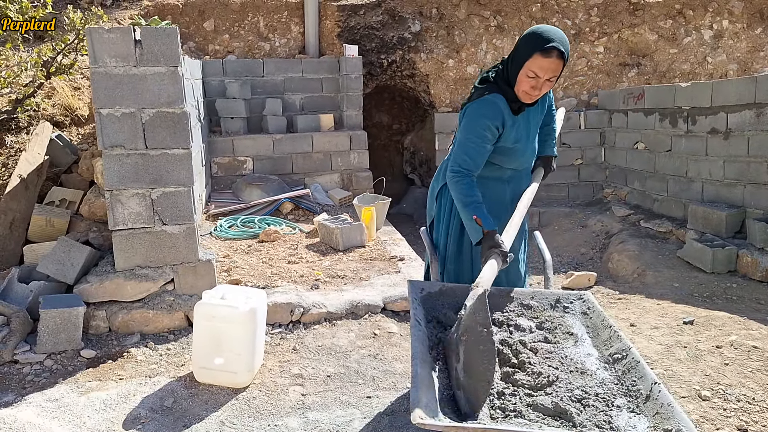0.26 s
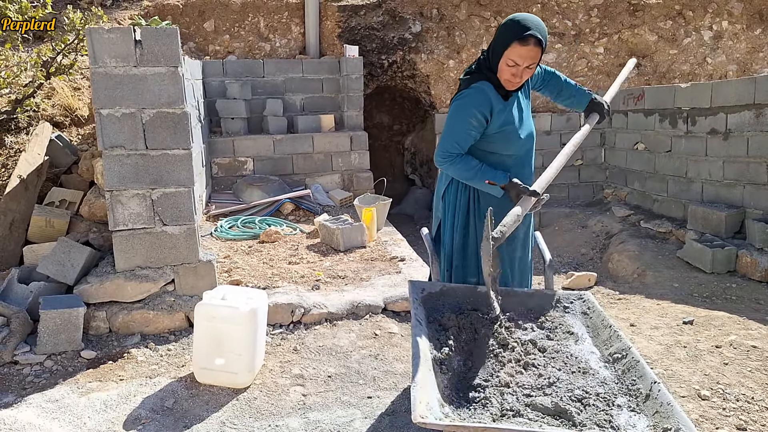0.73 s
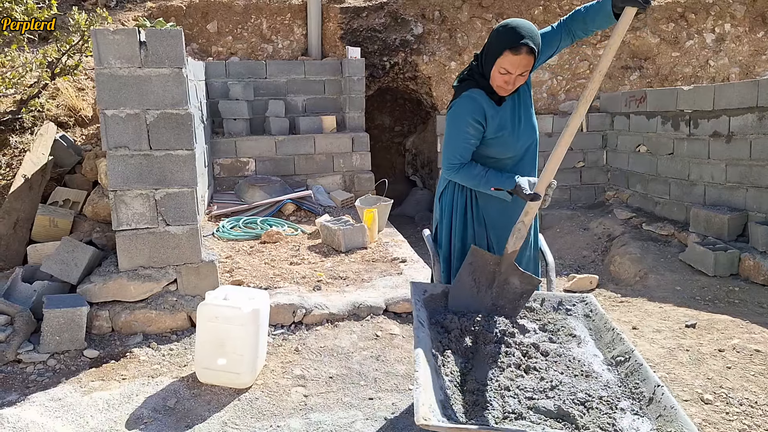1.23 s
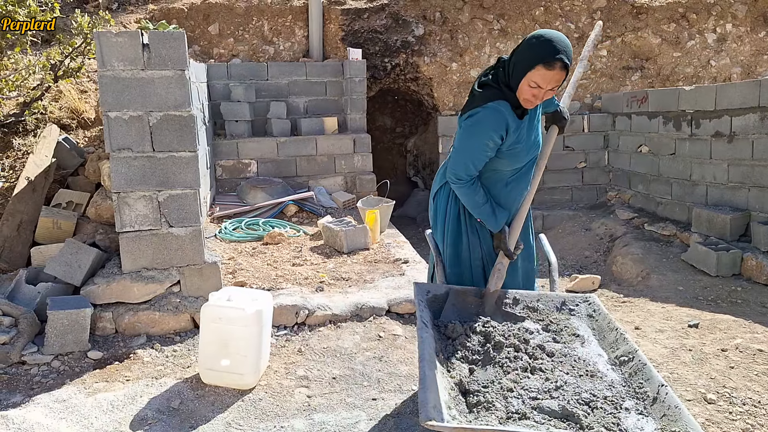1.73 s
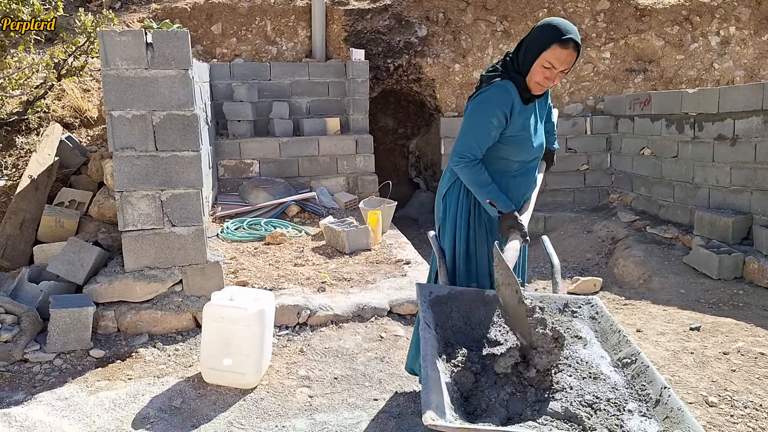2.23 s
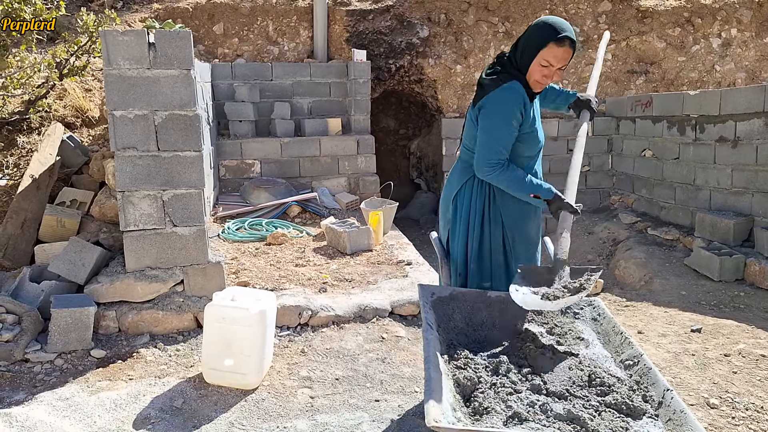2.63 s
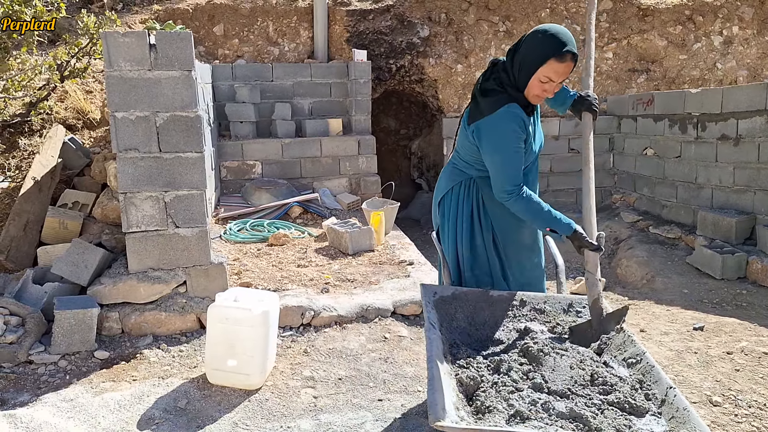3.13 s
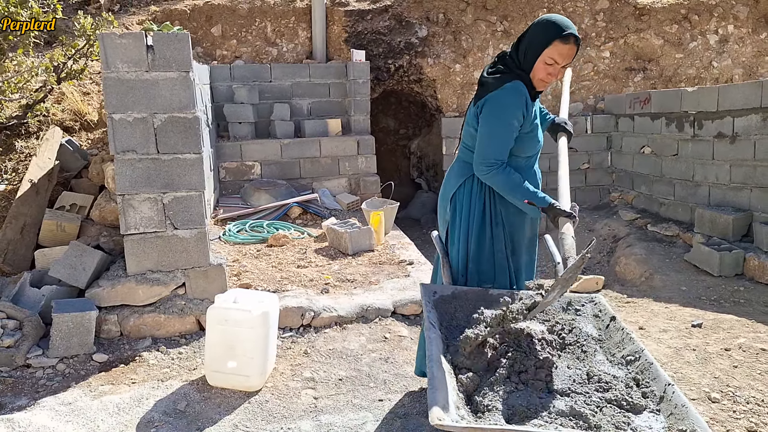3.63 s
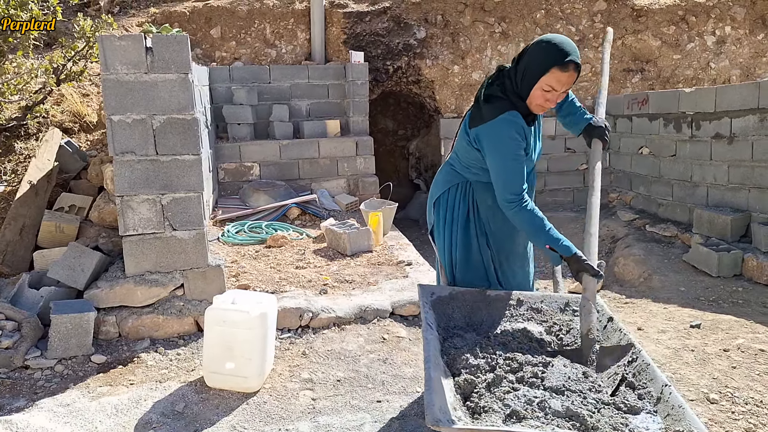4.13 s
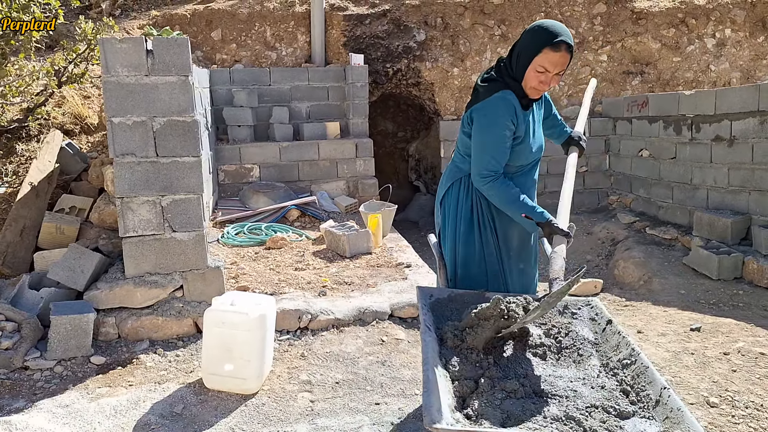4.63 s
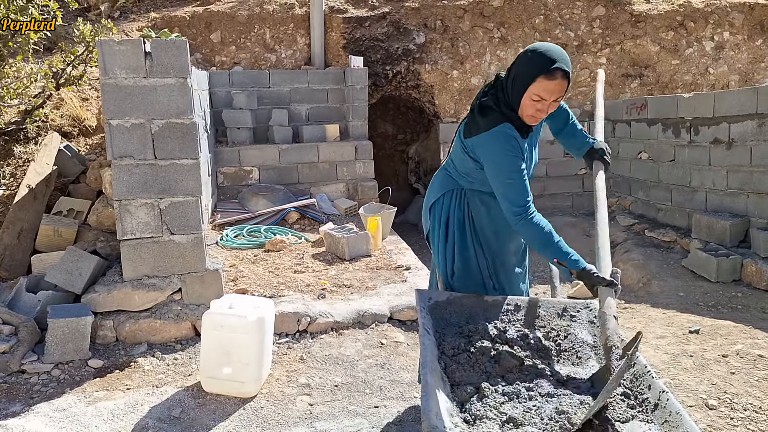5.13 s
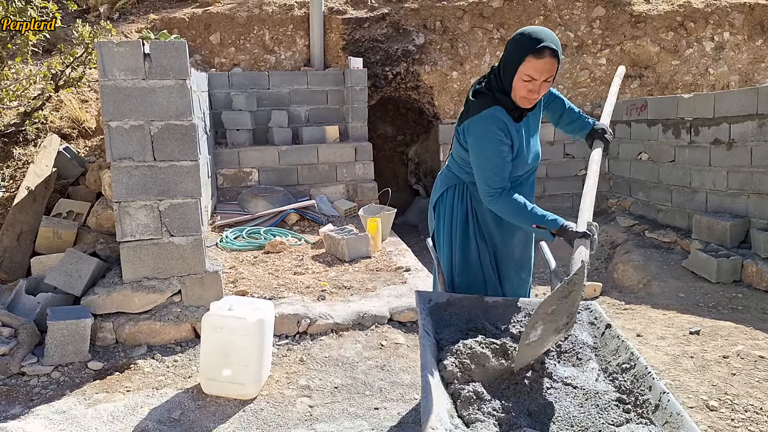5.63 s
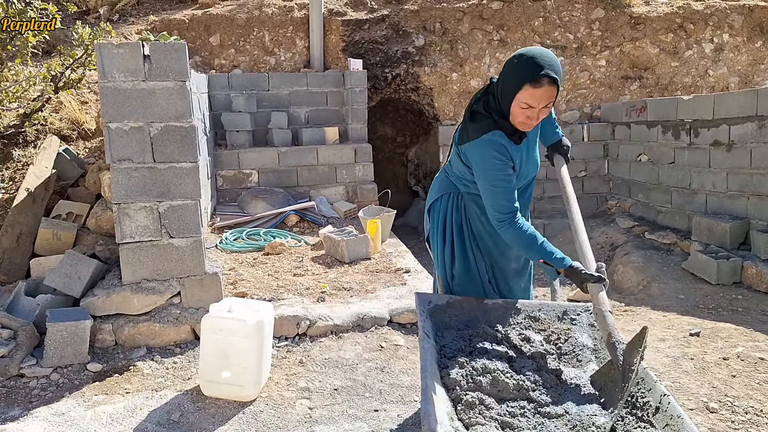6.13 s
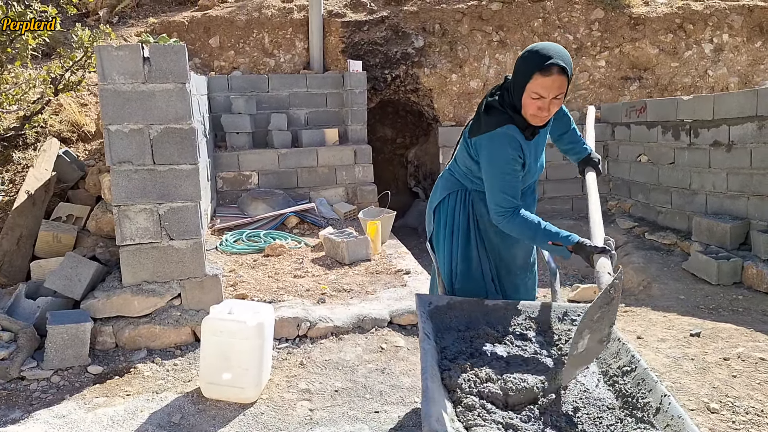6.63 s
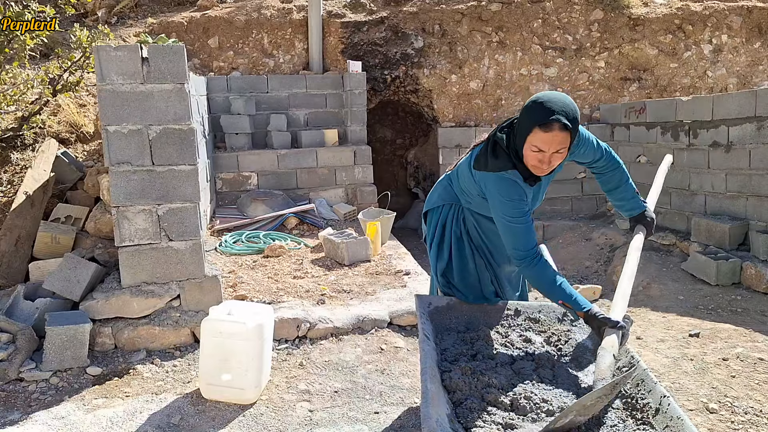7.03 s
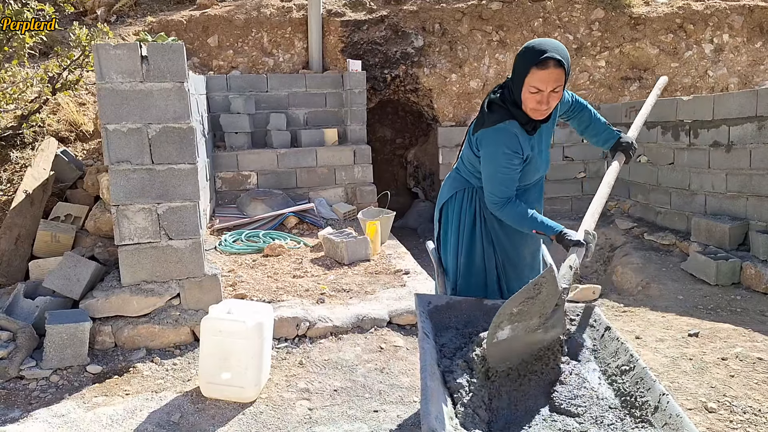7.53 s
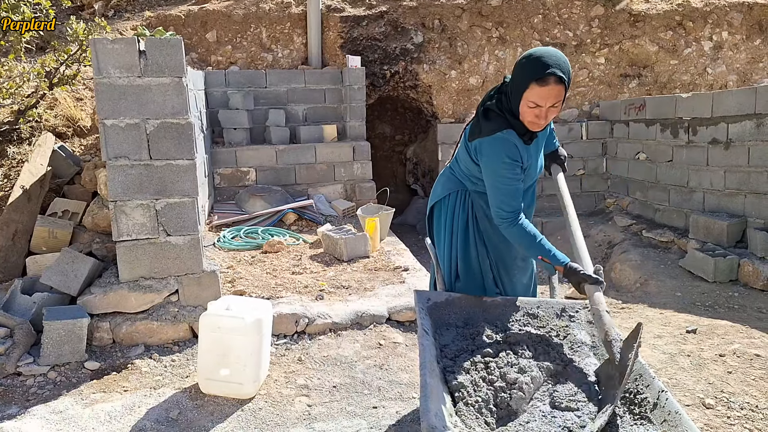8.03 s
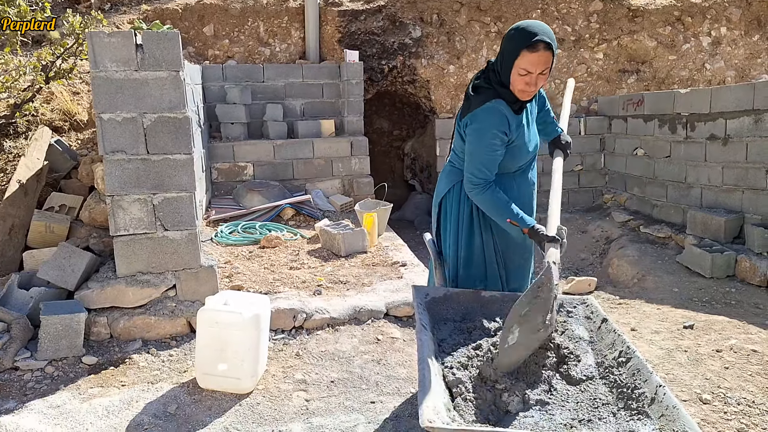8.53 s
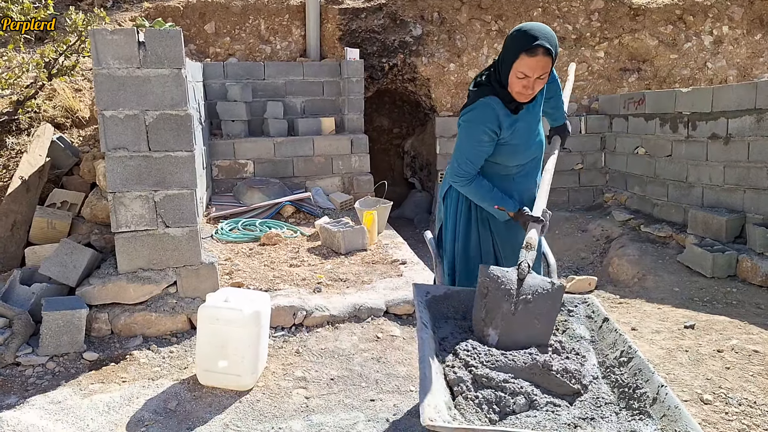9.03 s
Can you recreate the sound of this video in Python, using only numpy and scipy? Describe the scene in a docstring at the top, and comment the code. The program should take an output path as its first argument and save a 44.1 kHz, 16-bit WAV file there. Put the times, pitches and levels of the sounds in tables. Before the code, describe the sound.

A steel shovel scrapes and knocks through gritty wet mortar in a metal wheelbarrow while wind rumbles and thumps at the microphone.

```python
"""A steel shovel turns wet mortar in a wheelbarrow outdoors, a step from a phone with two microphone ports.
From the start wind rumbles, mostly at the left port (turbulence noise), over a faint trickle of grit.
From 0.2 s strokes hiss and grind (stick-slip noise through resonances), the edge knocks steel and grit
ticks (damped modes), most densely from 1.2 to 1.8 s; eddies thump the left port (gliding damped tones),
strongest after 4 s. Block walls, ground and the phone's body scatter the treble differently to the ports."""
import sys
import numpy as np
from scipy import signal
from scipy.fft import rfft, irfft
from scipy.io import wavfile
from scipy.ndimage import uniform_filter1d

SR = 44100
rng = np.random.default_rng(int(sys.argv[2]) if len(sys.argv) > 2 else 0)


def store_pcm(level_fs):
    """Save levels as 16-bit WAV."""
    pcm = np.round(np.clip(level_fs, -1, 1) * 32767).astype(np.int16)
    wavfile.write(sys.argv[1], SR, np.atleast_2d(pcm).T)


N = 408807
TAPS = 4096  # length of impulse responses, knocks and thumps, samples
HZ = np.arange(TAPS // 2 + 1) * SR / TAPS + 1  # 1 Hz offset keeps the logarithm finite


def undb(db):
    """Level definition: amplitude ratio from decibels."""
    return 10 ** (np.asarray(db) / 20)


def unit(x):
    """Normalisation to rms 1."""
    return x / np.sqrt(np.mean(x ** 2))


def peak(x):
    """Normalisation to peak 1."""
    return x / np.max(np.abs(x))


def spectrum_db(points):
    """Spectral envelope: points joined on a log-frequency axis."""
    hz, db = np.transpose(points)
    return np.interp(np.log(HZ), np.log(hz), db)


def modes_db(modes):
    """Modal superposition: the summed power of band-pass resonances."""
    power = sum(undb(2 * db) / (1 + ((HZ - hz * hz / HZ) / width) ** 2) for hz, width, db in modes)
    return 10 * np.log10(power)


def response(db):
    """Minimum phase: causal impulse response of this gain, from the folded cepstrum; energy 1."""
    cep = irfft(db * np.log(10) / 20)
    cep[1:TAPS // 2] *= 2
    cep[TAPS // 2 + 1:] = 0
    h = irfft(np.exp(rfft(cep)))
    return h / np.sqrt(np.sum(h ** 2))


def through(x, h):
    """Linear filtering: every row convolved with an impulse response."""
    return signal.oaconvolve(np.atleast_2d(x), h[None], axes=1)[:, :N]


def walk(rate):
    """Slow random modulation: values held 1 / rate s and smoothed twice; rms 1."""
    hold = int(SR / rate)
    steps = np.repeat(rng.standard_normal(N // hold + 1), hold)
    return unit(uniform_filter1d(uniform_filter1d(steps, hold), hold)[:N])


def decay(t, t60, push):
    """Exponential decay by 60 dB in t60 s, after an onset with time constant push s."""
    return (1 - np.exp(-t / push)) * np.exp(-np.log(1000) * t / t60)


def grains(per_s, spread_db, share, flicker_db, flicker_hz):
    """Granular friction: sand rush plus sparse uneven stones; two unrelated rows swell together; rms 1."""
    chance = rng.standard_normal((3, 2, N))
    hits = rng.random((2, N)) < per_s / SR
    stones = hits * np.sign(chance[0]) * undb(spread_db * chance[1])
    share = np.clip(share, 0, 1)  # power share of the stones
    rub = np.sqrt(1 - share) * chance[2] + np.sqrt(share) * unit(stones)
    return unit(rub * undb(flicker_db * walk(flicker_hz)))


# wind at the left port: t/s, level/dB
WIND = [(0, -50.5), (.5, -56.5), (1.2, -49), (1.75, -46.5), (2.0, -59.5), (2.45, -71), (2.6, -45.5),
        (2.921, -53.5), (3.1, -48), (3.62, -51.5), (3.799, -42.5), (3.95, -46.5), (4.3, -31.5), (4.8, -42),
        (5.42, -34.5), (5.62, -40.5), (5.8, -59.5), (6.05, -30), (6.551, -53), (6.8, -31), (7.799, -29.5),
        (8.6, -38), (9.27, -34)]
# spectral density of the turbulence: f/Hz, relative level/dB per Hz
GUST = [(15, -20.5), (30, -10.5), (50, 0.5), (70, -1), (110, -14), (170, -31), (280, -34.5), (500, -50),
        (900, -66.5)]
# the right port is sheltered by SHELTER_DB at BREEZE_DB of wind, more so in strong gusts (dB per dB)
SHELTER_DB, SHELTER_PER_DB, BREEZE_DB = -18, -0.76, -44
EDDY_DB, EDDY_HZ = 4.5, 12  # rms depth and rate of the buffeting


def wind_rumble():
    """Turbulent pressure fluctuation: independent band-shaped noise at each port, randomly buffeted."""
    db = np.interp(np.arange(N) / SR, *np.transpose(WIND))
    left = undb(db)
    right = left * undb(SHELTER_DB + SHELTER_PER_DB * (db - BREEZE_DB))
    gusts = [g * unit(rng.standard_normal(N) * undb(EDDY_DB * walk(EDDY_HZ))) for g in (left, right)]
    return through(gusts, response(spectrum_db(GUST)))


# drive levels, one table per stretch of scraping: t/s, grit hiss level/dB, blade grinding over hiss/dB
STRETCHES = [
    [(0.192, -41, 9.5), (0.218, -53.5, -4), (0.242, -35.5, -3), (0.332, -34.5, -7.5), (0.504, -48, -0.5),
     (0.596, -46, -7), (0.762, -65, -10), (0.932, -76, 5), (0.952, -66.5, -1), (1.084, -83, -9),
     (1.1, -56.5, -5)],
    [(1.116, -36.5, 4.5), (1.136, -33, -5.5), (1.162, -51.5, 4), (1.19, -44, 0.5), (1.262, -32.5, 9.5),
     (1.322, -37, 7.5), (1.33, -41, 16), (1.35, -39.5, 6.5), (1.356, -34, 6), (1.422, -44.5, 9),
     (1.49, -46, 6)],
    [(1.497, -35, 2.5), (1.539, -48.5, 14.5), (1.545, -36.5, 5), (1.639, -38.5, 7.5), (1.663, -28.5, -3.5),
     (1.671, -35, 3.5), (1.717, -55, 20), (1.727, -41.5, 8), (1.751, -36, 6.5), (1.779, -40, 5),
     (1.83, -68, 2)],
    [(1.83, -64.5, 5.5), (1.92, -65.5, 6.5), (2.188, -55.5, -10), (2.34, -43, -14.5), (2.416, -55.5, -8),
     (2.46, -51, -5), (2.56, -65.5, -7.5), (2.7, -76, -21.5), (2.722, -64, -10), (2.784, -78, -4),
     (2.95, -86, 0)],
    [(2.96, -63, -7), (3.01, -33.5, -1.5), (3.11, -40, -1), (3.136, -35.5, 5), (3.196, -59, 3.5),
     (3.484, -58.5, -1.5), (3.54, -49, -7), (3.686, -49.5, -6), (3.874, -59, -9.5), (4.008, -84, -4.5),
     (4.025, -51.5, -17)],
    [(4.042, -23, -14), (4.072, -34, -0.5), (4.11, -33.5, -3.5), (4.23, -47, 0), (4.486, -56, -1),
     (4.616, -43, -10), (4.682, -44.5, -12), (4.726, -50, -4.5), (4.93, -48, -6), (5.052, -80.5, -2),
     (5.068, -70, -14)],
    [(5.083, -34, -16), (5.097, -38, 4), (5.111, -42.5, -6.5), (5.179, -31, 0.5), (5.195, -34.5, -2.5),
     (5.319, -55, -2.5), (5.585, -50, -6), (5.707, -67, -6), (5.771, -52.5, -12.5), (5.893, -77.5, -2),
     (5.94, -77, -10)],
    [(5.956, -44.5, 1), (6.038, -39.5, -5), (6.046, -33, 12), (6.076, -45.5, 4.5), (6.126, -42.5, -0.5),
     (6.196, -37, -3.5), (6.334, -58.5, 2.5), (6.508, -49.5, -10.5), (6.63, -66.5, -3.5),
     (6.77, -55.5, -10), (6.885, -83.5, -5)],
    [(6.9, -42, 4), (6.916, -55, 15.5), (6.978, -47, 2.5), (7.014, -31.5, 3), (7.03, -37.5, 1),
     (7.118, -30, -5.5), (7.268, -52.5, 9), (7.33, -45.5, -4), (7.48, -53, -2), (7.576, -50, -3.5),
     (7.905, -66, -8)],
    [(7.92, -51, 12), (7.958, -40, -7), (7.98, -57, 13), (8.014, -55, -5), (8.03, -35, 0), (8.084, -29, -4),
     (8.088, -31, -6), (8.212, -52, 4), (8.488, -58, -3), (8.964, -54, -2.5), (9.06, -46, -2)],
    [(9.06, -42.5, -5.5), (9.132, -35.5, 0), (9.142, -21.5, -3), (9.158, -40.5, -5), (9.172, -40.5, 8),
     (9.208, -54, -2), (9.218, -53.5, 9.5), (9.27, -59.5, 7)],
]
# fizz and boom balance of each stretch of scraping: fine sand fizz over hiss/dB, tub boom over hiss/dB,
# both before the corrections for grinding and loudness
BALANCES = [(-4.5, -11), (-11.5, -14.5), (-13.5, -7.5), (-4.5, -8), (-3, -9), (-5, -8.5), (-4, -7.5),
            (-4, -6.5), (-6, -9.5), (-5.5, -9.5), (-3, -1)]
FIZZ_PER_GRIND, FIZZ_PER_HISS, SOFT_HISS_DB = -0.24, -0.12, -52  # hard, loud scraping sounds duller (dB per dB)
BOOM_PER_GRIND = 1.12  # the tub booms as the blade grinds on it (dB per dB)
REST_DB = -81.5  # faint trickle of grit before the first stretch


def scrape_levels():
    """Common excitation: most stretches start abruptly, some carry on; boom and fizz follow hiss and grinding."""
    t = np.arange(N) / SR
    out = np.full((4, N), REST_DB, float)
    for rows, (sand_db, tub_db) in zip(STRETCHES, BALANCES):
        s, hiss_db, grind_db = np.transpose(rows)
        boom_db = tub_db + BOOM_PER_GRIND * grind_db
        fizz_db = sand_db + FIZZ_PER_GRIND * grind_db + FIZZ_PER_HISS * (hiss_db - SOFT_HISS_DB)
        i = int(s[0] * SR)
        out[:, i:] = [np.interp(t[i:], s, hiss_db + db) for db in (0, grind_db, boom_db, fizz_db)]
    return undb(out)


# spectral density of the grit: f/Hz, relative level/dB per Hz
GRIT = [(900, -43.5), (1500, 5), (1940, -9.5), (2880, 3.5), (4160, 4), (7400, 6), (8300, -21), (11000, -43)]


def grit_hiss(grit):
    """Broadband friction: grit along the blade radiates shaped noise."""
    return undb(-2.0) * through(grit, response(spectrum_db(GRIT)))


# upper blade resonances rung by single stones: f/Hz, nominal bandwidth/Hz (sharpened below),
# level/dB over the grit drive
SHEEN = [(2380, 260, -10.5), (2870, 260, -11), (3634, 110, -18.5), (4080, 260, -18), (4705, 250, -16.5),
         (5420, 290, -19.5), (6620, 1000, -9.5)]
SPARK_DB = 3.6  # rms unevenness of single stones
RASP_DB, RASP_PER_OCTAVE_DB = -8, -15.0  # grinding slips reaching the lowest of them, and change per octave


def blade_sheen(grit, slips):
    """Forced resonance: stones and coarser slips spark the upper blade modes by turns."""
    out = np.zeros((2, N))
    for hz, width, db in SHEEN:
        rasp = undb(RASP_DB + RASP_PER_OCTAVE_DB * np.log2(hz / SHEEN[0][0])) * slips
        drive = (grit + rasp) * undb(db + SPARK_DB * walk(45))
        out += through(drive, response(1.286 * modes_db([(hz, width, 0)])))
    return out


# spectral density of the fine sand: f/Hz, relative level/dB per Hz
FIZZ = [(4000, -21.5), (6500, -2), (8600, -10.5), (10500, -2.5), (12000, -4), (14000, -10), (16000, -14.5)]


def sand_fizz(level):
    """Granular noise: many small grains, shaped to the high treble."""
    return through(level * grains(7100, 12.7, 0.32, 1.0, 50), response(spectrum_db(FIZZ)))


# broad resonances of the mortar-damped blade: f/Hz, nominal bandwidth/Hz (sharpened below), relative level/dB
BLADE = [(836, 370, 0), (1048, 220, -10), (1260, 380, -8), (1608, 100, -8.5)]
BLADE_SHARE_DB = -3.5  # the four modes together carry the grinding level
WANDER_DB = 3.5  # rms unevenness as the contact point moves


def blade_grind(slips):
    """Stick-slip excitation: the contact point wanders, so the blade's modes take turns."""
    out = np.zeros((2, N))
    for hz, width, db in BLADE:
        drive = slips * undb(db + BLADE_SHARE_DB + WANDER_DB * walk(30))
        out += through(drive, response(1.354 * modes_db([(hz, width, 0)])))
    return out


# broad resonances of the tub: f/Hz, nominal bandwidth/Hz, relative level/dB
# (the boom scales their summed dB curve, the knocks use the levels as they stand)
TUB = [(116, 82, 0.41), (211, 15, -1.7), (294.3, 200, 0.83), (390.3, 120, -0.066)]


def tub_boom(level):
    """Structure-borne sound: coarse slips drive the low resonances of the tub."""
    return through(level * grains(320, 4.9, 0.38, 2.3, 40), response(2.83 * modes_db(TUB)))


def scraping():
    """Source and resonator: grit and slips, under one set of scraping levels, excite blade and tub."""
    hiss, grind, boom, fizz = uniform_filter1d(scrape_levels(), int(0.0038 * SR))
    grit = hiss * grains(4000, 6.3, 0.26, 1.1, 50)
    slips = grind * grains(500, 3.8, 0.23, 3.2, 70)
    return grit_hiss(grit) + blade_sheen(grit, slips) + sand_fizz(fizz) + blade_grind(slips) + tub_boom(boom)


# single eddies that thump the left port: t/s, peak level/dB
THUMPS = [(.775, -42.5), (1.135, -31), (1.18, -31.5), (3.03, -24.5), (3.16, -30.5), (3.795, -27),
          (4.296, -31), (4.399, -21.5), (4.477, -20.5), (4.783, -26), (4.937, -21), (5.061, -26),
          (5.392, -17.5), (5.44, -16.5), (6.723, -26.5), (6.802, -21.5), (6.918, -23), (6.976, -23.5),
          (7.03, -18.5), (7.117, -19.5), (7.371, -21.5), (7.574, -19.5), (7.661, -14.5), (7.774, -14.5),
          (7.967, -21.5), (8.092, -21.5), (8.279, -17), (8.347, -22), (8.669, -19.5), (9.077, -17),
          (9.117, -18)]
THUMP_HZ, THUMP_SPREAD = 74.7, 0.1  # median pitch after the glide, and its log spread
THUMP_T60_S, THUMP_RISE_S, THUMP_GLIDE_S = 0.089, 0.00412, 0.0047
THUMP_RIGHT_DB = -27.5  # the sheltered port feels a little of each thump
SMALL_EDDIES_PER_S, SMALL_EDDY_DB, SMALL_SPREAD_DB = 10, 5, 3  # lesser thumps, peak over the wind's level


def eddy_thumps():
    """Transient pressure step: each eddy is a damped tone falling from twice its final pitch."""
    t, end = np.arange(TAPS) / SR, (N - 1) / SR
    out = np.zeros((2, N))
    when = rng.uniform(.02, end, round(SMALL_EDDIES_PER_S * end))
    wind_db = np.interp(when, *np.transpose(WIND))
    small_db = wind_db + SMALL_EDDY_DB + SMALL_SPREAD_DB * rng.standard_normal(len(when))
    eddies = [*THUMPS, *zip(when, small_db)]
    for (s, db), (way, size) in zip(eddies, rng.standard_normal((len(eddies), 2))):
        hz = THUMP_HZ * np.exp(THUMP_SPREAD * size)
        # the pressure step starts quick and slows as the eddy passes
        turns = hz * (t + THUMP_GLIDE_S * (1 - np.exp(-t / THUMP_GLIDE_S)))
        thump = np.sign(way) * peak(np.sin(2 * np.pi * turns) * decay(t, THUMP_T60_S, THUMP_RISE_S))
        i = int((s - 2 * THUMP_RISE_S) * SR)
        out[:, i:i + TAPS] += undb([[db], [db + THUMP_RIGHT_DB]]) * thump[:N - i]
    return out


NEIGHBOUR_DB, APART_DB = -4.5, -6  # modes near the struck one: level, and change per octave of distance


def struck(t, hz, modes, phases):
    """Modal excitation: the struck pitch sounds with its neighbours, weaker the farther away."""
    tone = np.sin(2 * np.pi * hz * t)
    for (f, _, db), phase in zip(modes, phases):
        gain = undb(db + NEIGHBOUR_DB + APART_DB * abs(np.log2(f / hz)))
        tone = tone + gain * np.sin(2 * np.pi * f * t + phase)
    return tone


# knocks of the edge on steel, and small ticks of grit: t/s, ring peak level/dB, ring f/Hz,
# thud peak over ring/dB, thud f/Hz, crack peak over ring/dB, crack f/Hz
KNOCKS = [(0.111, -65, 818, 4, 170, -2, 6720), (0.192, -34, 780, 4.5, 245, 4, 2190),
          (0.233, -36.5, 740, 1.5, 231, 8, 2860), (0.27, -34, 900, 5, 121, 9, 2920),
          (0.951, -56.5, 860, -4, 130, 4, 2800), (1.113, -35.5, 845, -13, 390, 7.5, 3020),
          (1.246, -18.5, 980, -19, 314, -8, 2960), (1.275, -15.5, 807, -30, 224, -8, 2800),
          (1.328, -10, 765, -42, 253, -22, 2830), (1.357, -20.5, 1260, -10, 426, -18, 2450),
          (1.38, -19, 750, -3, 366, -23, 2900), (1.467, -26.5, 1120, -13, 116, -16, 2360),
          (1.495, -23, 1040, -6, 367, -10, 3080), (1.521, -14.5, 1103, -18, 132, -22, 2190),
          (1.545, -17, 1030, -17, 387, -5.5, 2360), (1.602, -19, 1160, -13, 261, -8, 2820),
          (1.656, -15.5, 1020, -10, 259, -11, 2980), (1.701, -18.5, 1070, -4, 262, -19, 2890),
          (1.75, -21.5, 1030, -5, 260, -7, 2350), (2.12, -54, 1150, -23, 382, 11, 4730),
          (2.729, -71, 929, 9.5, 110, 6, 5900), (3.001, -26, 1037, -22.5, 212, -14, 5460),
          (3.01, -17.5, 1066, -15, 217, -3, 4730), (3.026, -17.5, 1015, -9.5, 279, -15, 2430),
          (3.139, -24, 1240, -14, 153, -1, 5070), (4.042, -32, 1250, -1, 136, 11.5, 6490),
          (4.869, -42, 767, -15, 110, 11, 6950), (4.918, -45, 972, 6.5, 127, 8, 2870),
          (5.083, -31, 1210, 3.5, 134, 9, 6870), (5.172, -28, 670, -2.5, 228, 9.5, 2390),
          (5.76, -52.5, 1110, -7, 127, 16, 4100), (5.957, -37.5, 760, 4, 197, 7, 3710),
          (6.045, -7.5, 784, -12.5, 299, -15.5, 4760), (6.061, -15.5, 740, -10, 115.5, -18, 2830),
          (6.769, -67, 724, 28.5, 120, 11, 2790), (6.898, -35, 710, 2, 216, 1, 2330),
          (7.004, -24.5, 1186, -12, 161, 2.5, 2170), (7.054, -28, 930, -10, 110, 1, 2890),
          (7.647, -56, 786, 25, 111, 0, 4830), (7.922, -35.5, 804, 8, 181, 6.5, 2320),
          (7.954, -33.5, 1240, 9.5, 135, 9.5, 3750), (8.076, -21.5, 770, -4, 110, 13, 5800),
          (9.141, -11, 730, -2, 139, -4, 5270), (9.166, -20, 750, 5, 138, -13, 2220),
          (9.221, -31.5, 907, 5, 110, -18, 2970)]
RING_T60_S, THUD_T60_S, CRACK_T60_S = 0.023, 0.098, 0.025
PUSH_S, THUD_PUSH_S = .002, 0.0021  # onset time constants; ring and thud start almost equally fast
CRACK_FIZZ_DB = 0.5  # fine sand over grit in the crack's filter


def knocks_and_ticks():
    """Impulsive excitation: a short push rings blade and tub, each loudest near its own pitch, and cracks grit."""
    out, t = np.zeros((2, N + TAPS)), np.arange(TAPS) / SR
    crack_filter = response(spectrum_db(GRIT)) + undb(CRACK_FIZZ_DB) * response(spectrum_db(FIZZ))
    for row, noise in zip(KNOCKS, rng.standard_normal((len(KNOCKS), 2, TAPS))):
        s, db, hz, thud_db, thud_hz, crack_db, crack_hz = row
        ring = struck(t, hz, BLADE, noise[0]) * decay(t, RING_T60_S, PUSH_S)
        thud = struck(t, thud_hz, TUB, noise[1]) * decay(t, THUD_T60_S, THUD_PUSH_S)
        # noise samples also serve as random phases
        crack_tone = 1.1 * np.sin(2 * np.pi * crack_hz * t + noise[:, -1:])
        crack = unit(signal.lfilter(crack_filter[:128], 1, noise)) + crack_tone
        crack = crack * decay(t, CRACK_T60_S, PUSH_S)
        knock = peak(ring) + undb(thud_db) * peak(thud) + undb(crack_db) * peak(crack)
        i = int((s - PUSH_S / 2) * SR)
        out[:, i:i + TAPS] += undb(db) * knock
    return out[:, :N]


# gain of the side-signal filter: f/Hz, level/dB
SCATTER = [(100, -28.5), (250, -20.5), (500, -15), (1000, -11), (2000, -4), (4000, -1.5), (16000, -2.5)]
RIGHT_LEAN = 0.27  # share of the mid signal taken from the side, so that the treble favours the right port
LEFT_LAG = 1  # samples by which the left port hears the shovel later


def scene():
    """Scattering: bass reaches both ports alike; walls, ground and phone's body part the treble; wind adds."""
    wind = wind_rumble()
    mid, other = scraping() + knocks_and_ticks()
    side_db = spectrum_db(SCATTER)
    side_gain = np.sqrt(np.mean(undb(2 * side_db)))  # restores the level that response() normalises
    side = through(other - RIGHT_LEAN * mid, response(side_db) * side_gain)[0]
    return np.array([np.roll(mid + side, LEFT_LAG), mid - side]) + wind + eddy_thumps()


def record(dry):
    """Band limitation: the phone cuts the top with a steep elliptic low-pass at 16100 Hz."""
    return signal.sosfilt(signal.ellip(10, .2, 70, 16100, fs=SR, output="sos"), dry)


dry = scene()
out = record(dry)
store_pcm(out)
```